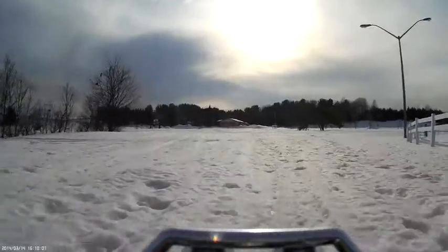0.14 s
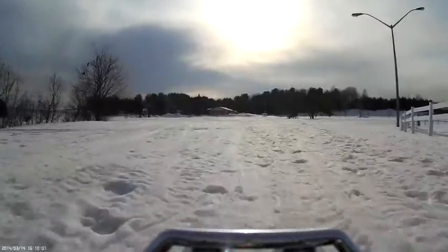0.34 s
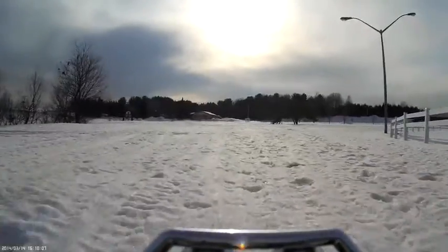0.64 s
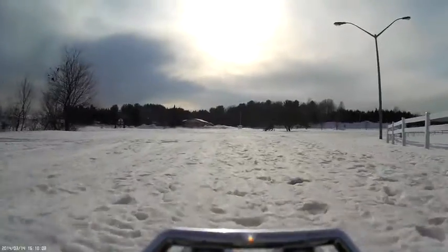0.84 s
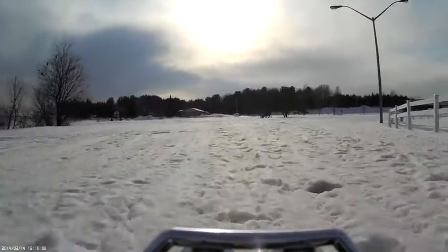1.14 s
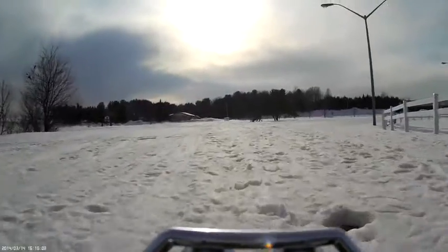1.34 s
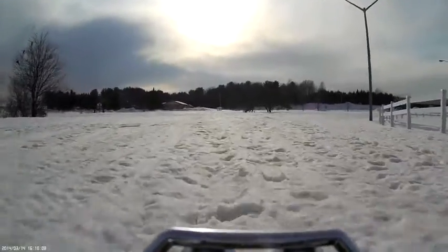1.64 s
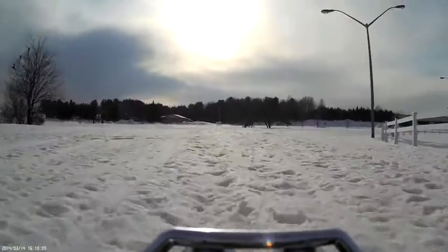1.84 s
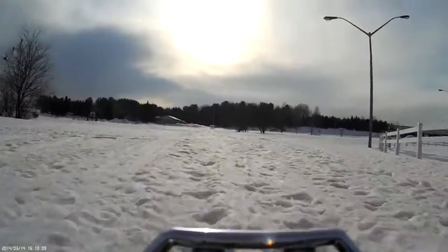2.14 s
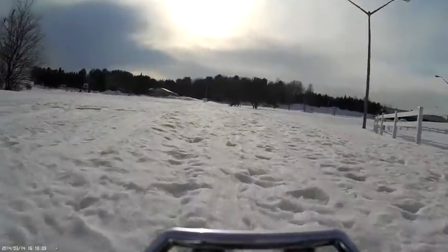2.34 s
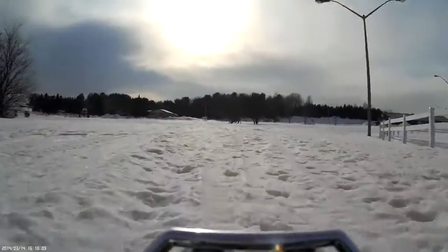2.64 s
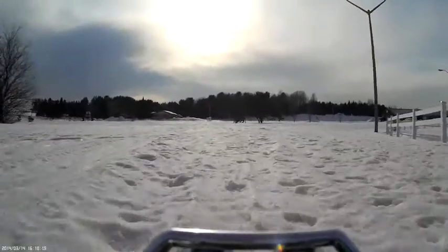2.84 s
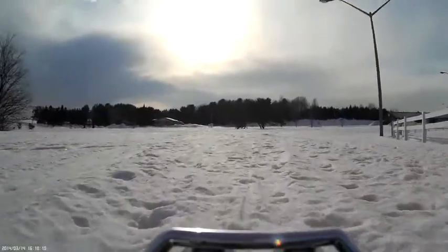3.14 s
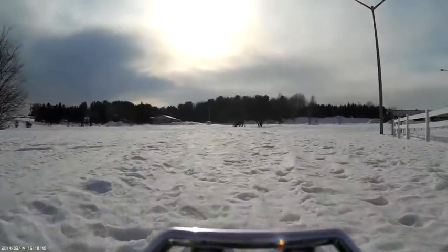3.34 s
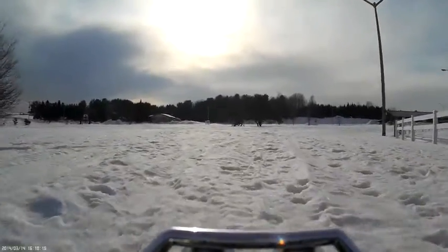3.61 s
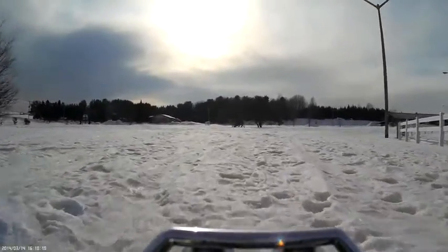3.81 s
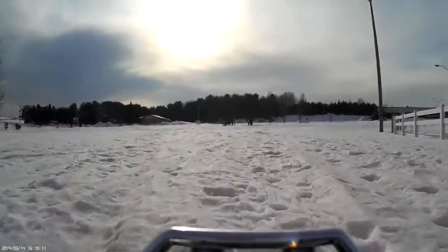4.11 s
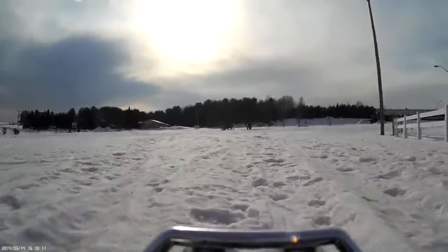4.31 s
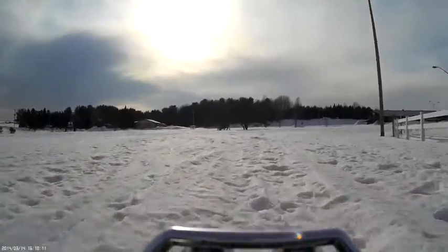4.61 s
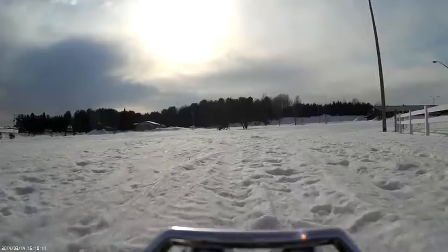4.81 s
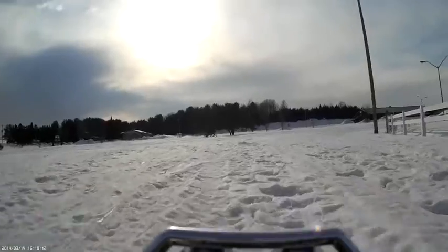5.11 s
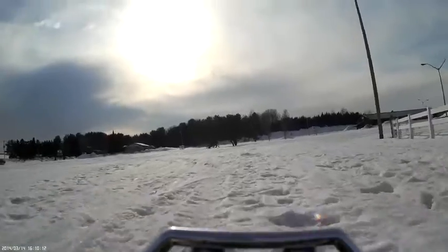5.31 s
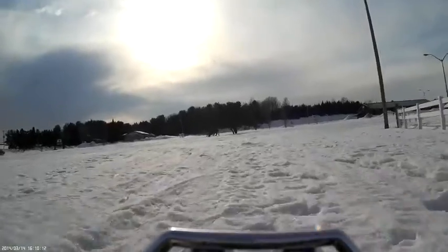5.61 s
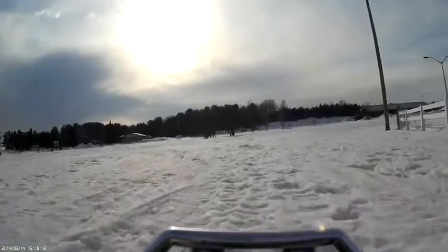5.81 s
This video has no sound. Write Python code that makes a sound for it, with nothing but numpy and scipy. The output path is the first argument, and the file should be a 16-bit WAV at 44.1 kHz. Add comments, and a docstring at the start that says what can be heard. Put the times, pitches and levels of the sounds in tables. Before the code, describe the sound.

Close on-board sound of a radio-controlled truck: buzzy, pulsing gear whine slowing and then speeding up, over tyre roar, snow crunch and bumps.

```python
"""Open packed snow: a small radio-controlled truck drives over it, heard from a camera on its body.
The electric motor's gears whine as noisy sine tones at multiples of the tooth rate, and rattle as random
blows ringing in the plastic housing; both throb at a tight spot once per wheel turn.
Slower gears growl. Tyres roar as filtered noise and crunch as random grains; bumps make the chassis boom.
One ice chip ticks on the body as a short noise burst."""
import sys
import numpy as np
from scipy import signal
from scipy.fft import rfft, irfft, next_fast_len
from scipy.io import wavfile
from scipy.ndimage import map_coordinates

SR = 44100
rng = np.random.default_rng(int(sys.argv[2]) if len(sys.argv) > 2 else 0)


def generate_wav(sig):
    """Save sig (samples, or channels by samples) to the path in sys.argv[1] as 16-bit PCM at SR."""
    pcm = np.round(np.clip(np.atleast_2d(sig).T, -1, 1) * 32767).astype(np.int16)
    wavfile.write(sys.argv[1], SR, pcm)


N = 262816

# Driving speed as the tooth mesh rate, before surges and hops; the truck eases off, then speeds up.
# Each row: time in seconds, mesh rate in Hz.
CRUISE = [(0.0, 1149.0), (0.24, 1154.0), (0.6, 1124.0), (1.2, 1074.0), (1.81, 1121.0), (2.5, 991.0),
          (2.53, 1084.0), (2.81, 972.0), (3.22, 886.0), (3.81, 849.0), (4.43, 803.0), (4.69, 836.0),
          (4.9, 899.0), (5.05, 907.0), (5.23, 996.0), (5.51, 1017.0), (5.83, 1130.0), (5.96, 980.0)]
# How hard the teeth bite, which brings out the higher tones. Each row: time in seconds, relative level in dB.
TOOTH_BITE = [(0, -5.5), (.3, -12), (.7, -8), (1.7, -4.5), (2.5, -10), (2.75, -4.5), (4.2, -2.5),
              (4.9, -0.5), (5.2, -4), (5.96, 0)]
# Rolling level, louder at speed and on hard crust. Each row: time in seconds, level in dB before each layer's trim.
ROLLING = [(0, -23.5), (.3, -26), (.7, -24), (.9, -26), (1.25, -25), (1.68, -22.5), (2, -25.5),
           (2.7, -28.5), (3.4, -31.5), (4.15, -32.5), (4.5, -32.5), (5, -32), (5.35, -25.5), (5.8, -31),
           (5.96, -19.5)]


def drivetrain(flutter=.002, hop_s=.014, landing_s=0.02, landing_half_s=0.014,
               landing_strain=0.6, hop_relief=4, slack=0.29):
    """Teeth passed so far, and the load on them, which swings once per wheel turn as the tight spot binds."""
    # How hard the tight spot binds. Each row: time in seconds, strain (1 = hard).
    strain_points = [(0, 0.62), (.8, 0.47), (1.05, 0.82), (1.6, 0.65), (2.8, 0.99), (3.5, 0.94),
                     (4.8, 0.55), (5.2, 1.01), (5.96, 1.15)]
    # The wheels lose grip for an instant and the motor races. Each row: time in seconds, share of speed gained.
    grip_losses = [(0.205, 0.054), (0.535, 0.058), (0.642, 0.058), (1.384, 0.054), (1.866, 0.09),
                   (2.02, 0.059), (2.158, 0.071), (2.286, 0.064), (2.458, 0.09), (2.596, 0.07),
                   (2.884, 0.111), (3.13, 0.092), (3.413, 0.094), (3.549, 0.039), (3.706, 0.072),
                   (3.854, 0.131), (4.262, 0.043), (4.367, 0.089), (4.521, 0.116), (4.686, 0.068),
                   (4.887, 0.044), (5.09, 0.086), (5.719, 0.077), (5.958, 0.173)]
    teeth_per_turn, tight_turn, surge_lead = 67.28, .361, .421  # the last two in wheel turns
    drag, rock_slow, rock_fast = .035, .022, .006  # swings of motor speed, as shares
    rock_hz, rock_drift = 9.5, .3  # rocking on the springs: rate, random drift in cycles

    mesh_hz, = curves(CRUISE)
    strain, = curves(strain_points)
    turn = np.cumsum(mesh_hz) / SR / teeth_per_turn - tight_turn

    # the motor speeds up between tight spots and is braked through each of them
    surge_depth = drag * strain * np.sqrt(np.abs(strain))
    surge = surge_depth * np.cos(2 * np.pi * (turn + surge_lead))
    rocks = rock_hz * np.arange(N) / SR + rock_drift * wobble(6)
    rock_depth = rock_slow + (rock_fast - rock_slow) * speed()
    rocking = rock_depth * np.cos(2 * np.pi * rocks)
    racing = sum(gain * swell(s, hop_s) for s, gain in grip_losses)
    motor_hz = mesh_hz * (1 + surge + rocking + racing + flutter * wobble(90))
    teeth = np.cumsum(motor_hz) / SR

    # each bind is broad, the slack between two is brief
    bind = np.cos(2 * np.pi * turn) - slack * np.cos(2 * np.pi * 2 * turn)
    # a hop unloads the teeth until the wheels grip again
    landing = sum(gain * swell(s + landing_s, landing_half_s) for s, gain in grip_losses)
    load = (strain + landing_strain * landing) * bind + hop_relief * (landing - racing)
    return teeth, load


def whine(teeth, load, octave_bite=0.3, low_throb_db=3, octave_throb_db=1.0):
    """The mesh tone and its octave swell where the speed meets a resonance, and roughen at full pace."""
    # Each row: mesh rate in Hz, mesh tone in dB, its octave in dB; both before bite and throb.
    resonant_levels = [(790, -26.5, -21), (806, -26, -21.5), (878, -23.5, -26.5), (894, -31, -19),
                       (1007, -32, -23.5), (1070, -35.5, -28), (1086, -35.5, -24.5), (1126, -31.5, -30)]
    mesh_hz = np.gradient(teeth) * SR
    rates, *levels = np.transpose(resonant_levels)
    mesh_db, second_db = (np.interp(mesh_hz, rates, level) for level in levels)
    bite_db, = curves(TOOTH_BITE)
    fast = speed()
    low = gear_tone(teeth, 1, rough_db=3.5 + 0.7 * fast, looseness=1 + 2 * fast)
    octave = gear_tone(teeth, 2, rough_db=4.5 + 0.19 * fast, looseness=1 + fast)
    low_gain = amp(mesh_db + low_throb_db * load)
    octave_gain = amp(second_db + octave_bite * bite_db + octave_throb_db * load)
    return low_gain * low + octave_gain * octave


def overtones(teeth, load, throb_db=4.0):
    """The higher gear tones flare up as they sweep through the housing's resonances."""
    # Each row: multiple of the mesh rate, dB at a crawl, dB at full pace; before bite, throb and housing.
    higher_tones = [(3, -33.5, -35.5), (4, -37, -43.5), (5, -48.5, -48), (6, -53, -50.5), (7, -51, -60),
                    (8, -56.5, -52.5), (9, -62, -66), (10, -64.5, -61)]
    bite_db, = curves(TOOTH_BITE)
    fast = speed()
    tones = 0
    for multiple, slow_db, fast_db in higher_tones:
        tone = gear_tone(teeth, round(multiple), rough_db=4.5, looseness=0.99 + 0.28 * fast)
        tones = tones + amp(slow_db + (fast_db - slow_db) * fast) * tone
    return coloured(tones * amp(bite_db + throb_db * load), housing)


def rattle(teeth, load, scatter=.2, size_db=2, rub=1.0, crawl_db=-27.5, pace_db=2.2, bite_share=0.091,
           dull_throb_db=1.0, bright_throb_db=4.5, split_hz=2700, uneven=0.31):
    """Each tooth lands with its own force; blows and rubbing noise ring the housing, brighter under load."""
    # Colour of the blows ahead of the housing. Each row: frequency in Hz, relative level in dB.
    clack_colour = [(200, -27.5), (600, 6.5), (900, 0), (1200, -1.5), (2000, 0), (2900, -1), (4200, -8),
                    (5100, -17), (5700, -13.5), (7200, -21), (10000, -22), (13000, -30), (15500, -42)]
    # Level of the rattle's treble. Each row: time in seconds, lift in dB before the throb.
    treble_points = [(0, 1), (.9, 0), (2.4, -0.5), (3.2, 1.5), (4.4, 0.5), (5, 0), (5.5, 2), (5.96, 3)]
    bite_db, = curves(TOOTH_BITE)
    treble_db, = curves(treble_points)
    rattle_db = crawl_db + pace_db * speed() + bite_share * bite_db

    tooth = np.arange(1, int(teeth[-1]))
    late, size, flank = rng.standard_normal((len(tooth), 3)).T
    at = np.interp(tooth + scatter * late, teeth, np.arange(N)).astype(int)  # scatter is in teeth
    impacts = np.bincount(at, amp(size_db * size) * np.sign(flank), N)
    blows = unit(impacts) + rub * rng.standard_normal(N)
    ring = unit(coloured(blows, lambda hz: along(clack_colour, hz) + housing(hz)))

    dull = signal.sosfiltfilt(signal.butter(2, split_hz, fs=SR, output="sos"), ring)
    bright = ring - dull
    force = load + uneven * wobble(70)  # no two turns are quite alike
    dull_gain = amp(dull_throb_db * force)
    bright_gain = amp(treble_db + bright_throb_db * force)
    return amp(rattle_db) * (dull * dull_gain + bright * bright_gain)


def growl(teeth, level_db=3, slow_db=-9):
    """The slower gears drone roughly, following the rolling level and strongest at full pace."""
    # Each row: share of the mesh rate, level in dB against the rolling level, before the trims above.
    slow_gears = [(.2, -26), (.42, -11), (.525, -5.5), (.585, -4)]
    tread_db, = curves(ROLLING)
    drone = sum(amp(db) * gear_tone(teeth, share, rough_db=7.0, looseness=1) for share, db in slow_gears)
    return amp(tread_db + level_db + slow_db * (1.5 - speed())) * drone


def tyres(load, roar_db=-1, fast_db=-9, throb_db=0.9, crunch_db=-21, grain_rate=700):
    """The tread roars in the hollow tyres as filtered noise and crushes snow grains, about 700 a second."""
    # Each row of both: frequency in Hz, relative level in dB.
    roar_colour = [(150, -10), (340, -35.5), (460, 5), (540, 0), (640, 4.5), (760, -2), (950, -13),
                   (2000, -70)]
    crunch_colour = [(500, -19), (1500, 9), (3500, -8), (6000, 3), (10000, -40), (15000, -28)]
    tread_db, = curves(ROLLING)
    roar = unit(coloured(rng.standard_normal(N), lambda hz: along(roar_colour, hz)))
    hits = rng.random(N) < grain_rate / SR
    grains = hits * rng.standard_normal(N) * amp(2.5 * wobble(25))
    crunch = unit(coloured(grains, lambda hz: along(crunch_colour, hz)))
    roar_gain = amp(roar_db + fast_db * speed() + throb_db * load)
    return amp(tread_db) * (roar_gain * roar + amp(crunch_db) * crunch)


def chassis(crawl_db=-40.0, pace_db=1.0):
    """The frame under the camera rumbles steadily and booms over ruts and footprints: low noise that swells."""
    # Each row: frequency in Hz, relative level in dB.
    rumble_colour = [(15, -4), (35, -6), (70, 0), (150, -5.5), (230, 0.5), (330, -5), (500, -0.5),
                     (1200, -57), (4000, -64)]
    # Ruts and footprints. Each row: time in seconds, rumble level in dB, half-length in seconds.
    ruts = [(0.144, -32, 0.022), (0.37, -31.5, 0.029), (0.593, -33, 0.019), (1.568, -34, 0.14),
            (2.711, -27.5, 0.012), (2.907, -29, 0.018), (3.457, -34, 0.012), (4.419, -34, 0.024),
            (4.777, -26.5, 0.078), (5.326, -32.5, 0.074), (5.468, -34, .08), (5.57, -27, .025),
            (5.903, -35.5, 0.39)]
    steady_power = amp(crawl_db + pace_db * speed()) ** 2
    power = steady_power + sum((amp(db) * swell(s, half_s)) ** 2 for s, db, half_s in ruts)
    return np.sqrt(power) * unit(coloured(rng.standard_normal(N), lambda hz: along(rumble_colour, hz)))


def chips(t60=0.014, level_db=-9, edge_hz=6000):
    """A thrown bit of ice ticks on the body: a treble noise burst that falls 60 dB in t60 seconds."""
    # Each row: strike time in seconds, level in dB before the trim and the band filter.
    ice_strikes = [(2.145, -13)]
    t = np.arange(N) / SR
    strikes = sum(amp(db + level_db - 60 * np.abs(t - s) / t60) * (t >= s) for s, db in ice_strikes)
    band = signal.butter(2, [edge_hz, 12000], "band", fs=SR, output="sos")
    return signal.sosfilt(band, strikes * rng.standard_normal(N))


def gear_tone(teeth, multiple, rough_db, looseness):
    """One multiple of the mesh rate; uneven teeth shake its strength and phase."""
    # Phase slip from uneven teeth. Each row: multiple of the mesh rate, slip in cycles before looseness.
    phase_slip = [(.2, .05), (.6, .07), (1, .035), (2, .033), (3, .055), (4, .065), (5, .1), (7, .25),
                  (10, .3)]
    shake = 2.12 * np.tanh(.5 * wobble(70) + 0.44 * wobble(220))
    slip = looseness * np.interp(multiple, *np.transpose(phase_slip))
    cycles = multiple * teeth + slip * wobble(240)
    return unit(amp(rough_db * shake) * np.sin(2 * np.pi * cycles))


def housing(hz):
    """Lift in dB by the resonances of the plastic gear housing and body shell."""
    # Each row: centre in Hz, width in Hz, lift in dB.
    resonances = [(1306, 44, 5.5), (1590, 200, 10), (1837, 250, 8.5), (2217, 140, 6), (3401, 230, 10.5),
                  (3738, 168, 10), (4030, 470, 4), (4580, 175, 8), (4900, 270, -2), (5080, 1200, 5.5),
                  (6810, 170, 7), (7740, 250, 12), (8350, 410, 12), (9470, 380, 8), (9890, 280, 10.5),
                  (11530, 660, 5), (14600, 600, 7)]
    return sum(db / (1 + (2 * (hz - centre) / width) ** 2) for centre, width, db in resonances)


def speed():
    """Driving speed from the mesh rate: 0 at a crawl, 1 at full pace."""
    mesh_hz, = curves(CRUISE)
    return np.clip((mesh_hz - 870) / 250, 0, 1)


def swell(s, half_s):
    """A smooth Gaussian hump of height 1 around time s."""
    hump = np.zeros(N)
    first = max(0, int((s - 5 * half_s) * SR))
    last = min(N, int((s + 5 * half_s) * SR))
    near = np.arange(first, last)
    hump[near] = np.exp(-.5 * ((near / SR - s) / half_s) ** 2)
    return hump


def wobble(rate):
    """A smooth random curve with rate knots a second."""
    at = np.linspace(0, N * rate / SR, N // 20)
    coarse = map_coordinates(rng.standard_normal(int(at[-1]) + 4), [at])
    return np.interp(np.arange(N) * rate / SR, at, coarse)


def coloured(x, level):
    """Causal (minimum-phase) filter whose gain in dB is level(Hz), so that resonances ring after a blow."""
    m = 2 * next_fast_len(N // 2 + 8192)
    gain = amp(level(np.fft.rfftfreq(m, 1 / SR)))
    cepstrum = irfft(np.log(gain + 1e-6), m)
    # folding the cepstrum forward in time makes the filter causal
    cepstrum[1:m // 2] *= 2
    cepstrum[m // 2 + 1:] = 0
    return irfft(rfft(x, m) * np.exp(rfft(cepstrum)), m)[:N]


def along(points, hz):
    """Read (Hz, value) points on a log frequency axis."""
    f, v = np.transpose(points)
    return np.interp(np.log(hz + 1), np.log(f), v)


def curves(rows):
    """One value per sample for each column after the time."""
    s, *cols = np.transpose(rows)
    return [np.interp(np.arange(N) / SR, s, c) for c in cols]


def amp(db):
    """Decibels to gain."""
    return 10 ** (np.asarray(db) / 20)


def unit(x):
    """Scale to rms 1."""
    return x / np.sqrt(np.mean(x ** 2) + 1e-20)


def scene():
    """Everything rides with the camera; open snow gives no echo."""
    teeth, load = drivetrain()
    gears = whine(teeth, load) + overtones(teeth, load) + rattle(teeth, load) + growl(teeth)
    return (gears + tyres(load) + chassis() + chips())[None]


def record(dry):
    """The camera keeps nothing above its band limit."""
    top_hz = 15300
    m = next_fast_len(N + 8192)
    kept = np.fft.rfftfreq(m, 1 / SR) < top_hz
    return irfft(rfft(dry, m) * kept, m)[..., :N]


dry = scene()
out = record(dry)
generate_wav(out)
```